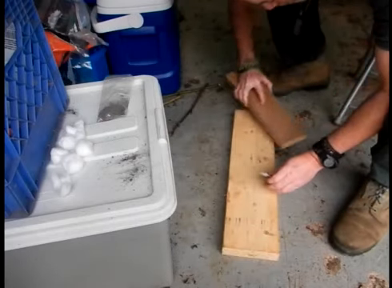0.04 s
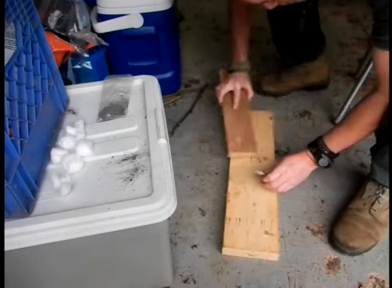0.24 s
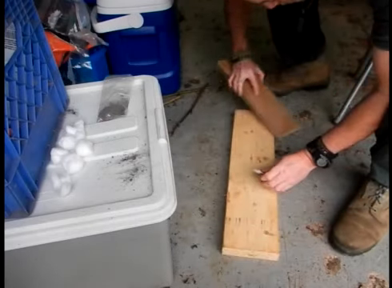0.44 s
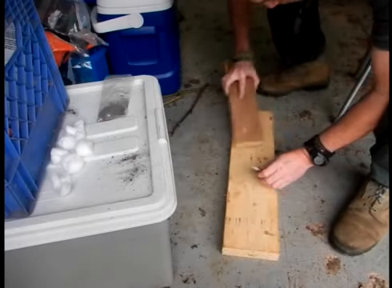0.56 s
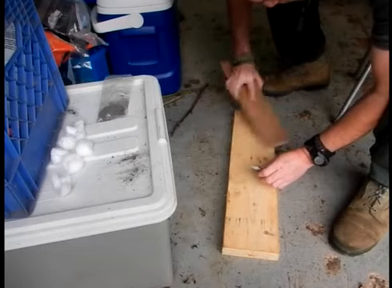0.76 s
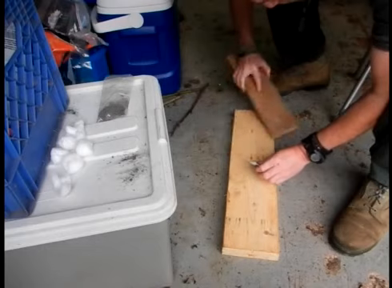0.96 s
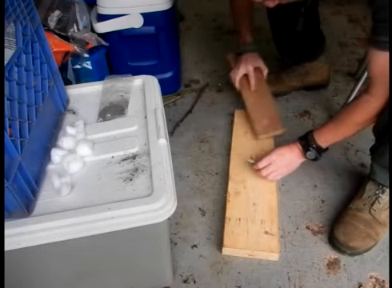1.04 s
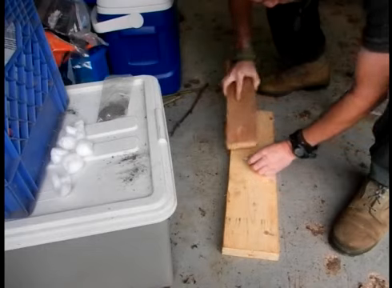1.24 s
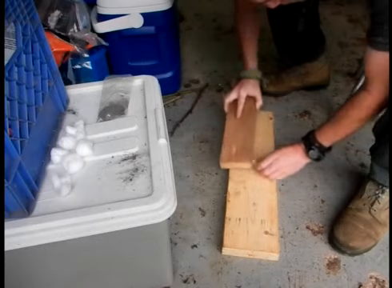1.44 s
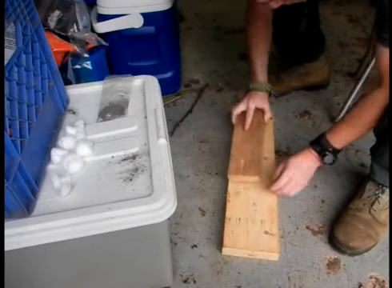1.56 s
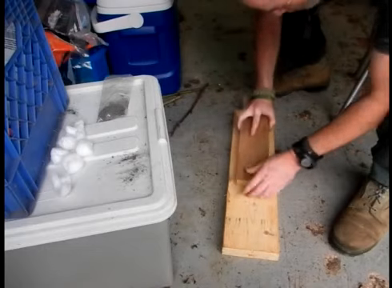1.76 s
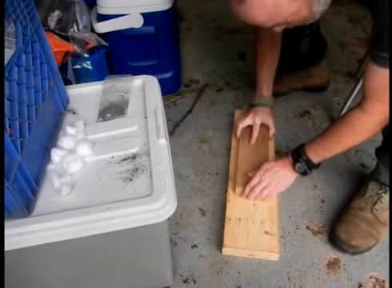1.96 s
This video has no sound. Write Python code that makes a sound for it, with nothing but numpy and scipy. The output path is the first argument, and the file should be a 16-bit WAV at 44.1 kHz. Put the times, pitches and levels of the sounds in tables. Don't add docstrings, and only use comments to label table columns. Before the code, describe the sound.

A wooden board knocks onto another and scrapes across it in two short, gritty strokes

```python
import sys
import numpy as np
from scipy import signal
from scipy.io import wavfile
from scipy.ndimage import uniform_filter1d

SR = 44100
rng = np.random.default_rng(int(sys.argv[2]) if len(sys.argv) > 2 else 0)


def magnitude_from_level(level_db):
    exponent = np.asarray(level_db, float) / 20
    return 10 ** exponent


def generate_wav(sig):
    pcm = np.round(np.clip(np.atleast_2d(sig).T, -1, 1) * 32767).astype(np.int16)
    wavfile.write(sys.argv[1], SR, pcm)


N = 88200

# (frequency [Hz], density [dB per Hz])
HUSH_SPECTRUM = [(25, -38), (66, -24), (368, -13.5), (433, 1.5), (703, -8.5), (1020, -6), (7500, -21),
                 (14300, -25.5), (15500, -25)]
# (time [s], level [dB])
HUSH_FADER = [(0.0, -52.5), (0.41, -51.5), (1.06, -51.5), (2.0, -50.5)]
# (centre [Hz], width [Hz], level [dB])
HUSH_HUMPS = [(398.3, 98, -10.5), (1064, 67, -22.5), (121.6, 113, -12)]
# (time [s], level [dB])
RUSTLE_FADER = [(0, -83), (.9, -84), (1.25, -62), (1.62, -62.5), (1.85, -57.5), (2, -52.5)]
# (frequency [Hz], likeness [0 to 1])
HUSH_LIKENESS = [(60, 0.34), (180, 0.14), (550, 0.034), (1650, 0.47), (4970, 0.33), (15000, 0.016)]
# (frequency [Hz], left over right [dB])
NOISE_LEAN = [(60, 11), (180, -7.5), (550, 3.5), (1650, 2.5), (4970, 2), (15000, -4)]
# (frequency [Hz], left over right [dB])
WOOD_LEAN = [(120, 1), (500, 4.6), (1100, 2.2), (2000, 1.2), (4000, .4)]
# (time [s], level [dB], pitch [Hz])
FLOOR_THUDS = [(0.207, -30.5, 141), (0.206, -29.5, 46), (.318, -40, 112), (.639, -30.5, 390),
               (.645, -39, 191), (0.662, -39, 135), (0.721, -47, 50), (1.9, -47, 194), (0.49, -52, 87),
               (1.887, -53, 55)]
# (time [s], pitch [Hz], level [dB], T60 [s])
SINGLE_RINGS = [(1.657, 507, -41, .22), (1.658, 707, -41, .22), (1.704, 500, -45, .09),
                (1.888, 520, -40.5, .17), (1.894, 1780, -45, .08), (1.8868, 1250, -38, .04),
                (.431, 1800, -44, .1), (.709, 720, -29, .13), (.313, 715, -37, .1), (.6388, 3560, -31, .04),
                (.6388, 4250, -33, .04), (.6388, 5700, -28, .035)]
# (pitch [Hz], level when knocked [dB], T60 [s], level when rubbed [dB])
WOOD_MODES = [(380.6, -11.5, 0.11, -32), (511.4, 4, 0.16, -15.5), (720, -7, 0.15, -4.5),
              (870, -7, 0.06, -28), (1106, -1, 0.073, -8), (1260, -47, 0.07, -0.5), (1340, -47, 0.08, -32),
              (1600, -36, 0.011, -1), (1628, 0, 0.064, -5), (1802, 6, 0.073, -5.5), (1982, 0.5, 0.056, -1),
              (2310, 5, 0.011, -26), (2854, -5.5, 0.051, -19), (3460, -9, 0.05, -30)]
# (time [s], crack [dB], crack pitch [Hz], rings under 1 kHz [dB], rings above [dB])
KNOCKS = [
    (0.2046, -15, 1647, -12.5, -15.5),
    (0.425, -50, 1860, -56, -46),
    (.638, -14.5, 1810, -13.5, -15),
    (1.6562, -32.5, 1120, -58, -42.5),
    (1.705, -59, 674, -69, -60),
    (1.8862, -31, 1290, -49, -39),
]
# (pitch [Hz], level [dB], T60 [s])
SPLINTER_RINGS = [(3650, -16, 0.044), (4170, -3, 0.099), (4980, 6, 0.031), (5320, 1, 0.084),
                  (5600, -14, .035)]
# (time [s], level [dB], favoured pitch [Hz], length [s])
SLIPS = [(0.243, -26.5, 1590, 0.005), (0.254, -30, 1704, 0.0076), (0.272, -23, 1660, 0.0023),
         (0.275, -30.5, 1795, 0.0076), (0.2846, -28, 1910, 0.0077), (.303, -33, 1640, 0.0068),
         (0.3143, -22.5, 1665, 0.0058), (0.324, -30, 1487, 0.0053), (0.322, -48, 508, 0.017),
         (0.339, -39.5, 1230, 0.0083), (0.4234, -36, 2980, 0.0037), (.4238, -32.5, 1470, 0.0023),
         (0.4247, -31.5, 1827, 0.0059), (0.4334, -40, 1860, 0.0055), (.255, -50.5, 513, 0.028),
         (0.673, -44, 587, .02), (0.689, -32, 1480, 0.0086), (.718, -28.5, 1770, 0.0058),
         (0.684, -33, 1223, 0.0071), (0.695, -31, 1600, 0.0056), (0.703, -24, 1800, 0.0054),
         (.710, -25, 1737, 0.0046), (0.7114, -38, 1810, 0.0043), (0.716, -31, 1700, 0.0069),
         (0.734, -40, 1790, 0.0027), (.746, -49, 1780, 0.0032), (1.658, -57, 1800, 0.0043)]
# (time [s], pressure [dB], sliding speed as fine hiss [dB])
STROKES = [
    [(.16, -119, -6), (.185, -61, -13), (.22, -63, 1.5), (.25, -52, -3.5), (.29, -53.5, -3.5),
     (.322, -52, -3), (.36, -67.5, 4), (.41, -78.5, 5)],
    [(.41, -71, 3), (.422, -70, 7), (.4255, -50, -2.5), (.438, -60, -1.5), (.46, -72.5, 4.5), (.52, -79, 2)],
    [(.6, -96, -8), (.63, -57, -18), (.645, -54.5, -6.5), (.68, -60.5, -3.5), (.712, -53.5, -1),
     (.735, -60.5, -2), (.76, -69.5, -2), (.85, -80, 1)],
]
STROKE_WEIGHT_DB = [0, -14, 0]
# (frequency [Hz], density [dB per Hz])
RUB_SPECTRUM = [(200, -19), (728, -8.5), (957, -7.5), (1650, -5), (2290, -11), (6500, -20.5),
                (12500, -16.5), (15500, -29.5)]

WEIGHT_HZ = 1300
DULL_DB_PER_OCT = 16
RING_DELAY_S = 0.000963


def rms_one(x):
    return x / np.sqrt(np.mean(x ** 2) + 1e-20)


def in_time(rows, axis=1):
    rows = np.array(rows)
    return np.interp(np.arange(N) / SR, rows[:, 0], rows[:, axis])


def at_hz(points, hz):
    points = np.array(points)
    return np.interp(np.log(hz), np.log(np.maximum(points[:, 0], 1)), points[:, 1])


def pan(lean_db):
    return magnitude_from_level([[lean_db / 2], [-lean_db / 2]])


def drift(rate_hz):
    r = np.exp(-2 * np.pi * rate_hz * 40 / SR)
    white = rng.standard_normal(N // 40 + 2002)
    slow = rms_one(signal.lfilter([1], [1, -2 * r, r * r], white)[2000:])
    return np.interp(np.arange(N) / 40, np.arange(len(slow)), slow)


def click(s):
    return 1. * (np.arange(N) == int(s * SR))


def cushion(hits):
    return signal.lfilter(*signal.butter(2, 3740, fs=SR), hits)


def ring(clicks, hz, t60):
    r, w = magnitude_from_level(-60 / (t60 * SR)), 2 * np.pi * hz / SR
    return signal.lfilter([0, np.sin(w)], [1, -2 * r * np.cos(w), r * r], clicks + 1e-18)


def band(x, low_hz, high_hz):
    sos = signal.butter(2, [low_hz, min(high_hz, SR / 2.2)], "band", fs=SR, output="sos")
    return signal.sosfilt(sos, x)


def banded(white, spectrum, patchy_db, alike_at):
    out, together = 0, drift(1.5)
    edges = 22 * 2 ** np.arange(0, 9.6, .5)
    for k, (low, high) in enumerate(zip(edges, edges[1:])):
        mid, side = band(white[k % 2], low, high)
        hz = np.sqrt(low * high)
        alike = np.clip(alike_at(hz), -1, 1)
        flicker_db = patchy_db * (.3 * together + .6 * drift(6))
        gain = magnitude_from_level(at_hz(spectrum, hz) + flicker_db) * pan(at_hz(NOISE_LEAN, hz))
        out = out + gain * (np.sqrt(1 + alike) * mid + np.sqrt(1 - alike) * side * [[1], [-1]])
    return rms_one(out)


def hush():
    white = rng.standard_normal((2, 2, N))
    out = banded(white, HUSH_SPECTRUM, 1.93, lambda hz: at_hz(HUSH_LIKENESS, hz) + 0.017)
    mid, side = rng.standard_normal((2, N))
    air = mid + 0.69 * side * np.array([[1], [-1]])
    for hz, width_hz, db in HUSH_HUMPS:
        out = out + magnitude_from_level(db) * rms_one(band(air, hz - width_hz / 2, hz + width_hz / 2))
    return magnitude_from_level(in_time(HUSH_FADER) + 0.5) * out


def rustle():
    level = magnitude_from_level(in_time(RUSTLE_FADER) + 0.5 * drift(45))
    return level * rms_one(band(rng.standard_normal((2, N)), 2200, 11700))


def whine():
    tone = np.sqrt(2) * np.sin(2 * np.pi * 14835 * np.arange(N) / SR)
    return magnitude_from_level(-70.5) * pan(-5) * tone


def garage(x):
    t60_s, wall_cut_hz = 0.25, 3400
    out, dull = np.zeros((2, N)), np.exp(-2 * np.pi * wall_cut_hz / SR)
    for k, lag in enumerate((rng.uniform(.006, .03, 16) * SR).astype(int)):
        loop, state = x.copy(), [0.]
        gain = magnitude_from_level(-60 * lag / SR / t60_s)
        for i in range(lag, N, lag):
            back, state = signal.lfilter([gain * (1 - dull)], [1, -dull], loop[i - lag:i], zi=state)
            loop[i:i + lag] += back[:N - i]
        out[k % 2] += (loop - x) * (-1) ** (k // 2)
    return out


def floor_thuds():
    return sum(magnitude_from_level(db) * ring(cushion(click(s)), hz, 0.11) for s, db, hz in FLOOR_THUDS)


def single_rings():
    out = np.zeros((2, N))
    for s, hz, db, t60 in SINGLE_RINGS:
        out += magnitude_from_level(db) * pan(at_hz(WOOD_LEAN, hz)) * ring(cushion(click(s)), hz, t60)
    return out


def knocked_wood():
    s, _, crack_hz, low_db, high_db = np.transpose(KNOCKS)
    spots_db = rng.normal(0, 2.3, (len(s), len(WOOD_MODES)))
    out = np.zeros((2, N))
    for k, (hz, knock_db, t60, _) in enumerate(WOOD_MODES):
        hits, low = np.zeros(N), hz < 1000
        at = ((s + RING_DELAY_S + low * 0.0014) * SR).astype(int)
        dull_db = DULL_DB_PER_OCT * np.log2(crack_hz / 1600) * max(np.log2(hz / 1900), 0)
        level_db = -11 + knock_db + spots_db[:, k] + (low_db if low else high_db) + dull_db
        hits[at] = (-1) ** k * magnitude_from_level(level_db)
        out += ring(cushion(hits), hz, t60) * pan(at_hz(WOOD_LEAN, hz))
    return out


def burst(s, length_s, hz, rough, sag_oct=0):
    out, size = np.zeros(N), int(length_s * SR)
    noise, along = rng.standard_normal(SR // 20)[:size], np.linspace(0, 1, size)
    phase = np.cumsum(2 * np.pi * hz * 2 ** (sag_oct * (.5 - along)) / SR)
    tone = np.sin(phase + rough * np.cumsum(noise) / 8)
    out[int(s * SR):int(s * SR) + size] = np.hanning(size) * tone * (1 + rough * uniform_filter1d(noise, size=12))
    return out


def cracks():
    crack_s = 0.00334
    out = np.zeros((2, N))
    for s, db, hz, _, _ in KNOCKS:
        out += magnitude_from_level(db) * pan(1.8) * burst(s, crack_s, hz, 0.49, sag_oct=0.77)
        hard = db > -25
        out += hard * magnitude_from_level(db - 6.5) * burst(s + 0.00095, crack_s, min(hz * 0.628, 1050), 0)
        splinters = sum(magnitude_from_level(d) * ring(click(s + RING_DELAY_S), f, t60) for f, d, t60 in SPLINTER_RINGS)
        out += magnitude_from_level(db - 35 + DULL_DB_PER_OCT * np.log2(hz / 1600)) * splinters
    return out


def grit_grains():
    sizes = magnitude_from_level(2 * np.minimum(rng.exponential(1, N), 5)) * rng.choice([-1, 1], N)
    return rms_one(sizes * (rng.random(N) < 3600 / SR))


def slip_chirps():
    return sum(magnitude_from_level(db) * burst(s, length_s, hz, .3) for s, db, hz, length_s in SLIPS)


def rubbed_wood(grit, slips, pressure, weight):
    out = np.zeros((2, N))
    for hz, _, t60, rub_db in WOOD_MODES:
        body = weight if hz < WEIGHT_HZ else 1
        drive = magnitude_from_level(rub_db - 10) * pressure * grit * body + magnitude_from_level(-35) * slips
        out += ring(drive, hz, t60 * .42) * pan(at_hz(WOOD_LEAN, hz))
    return out


def rub_hiss(grit, speed, weight):
    def split(x, hz, kind):
        return signal.sosfiltfilt(signal.butter(2, hz, kind, fs=SR, output="sos"), x)

    white = rng.standard_normal((2, 2, N)) + 0.66 * grit * [[1], [0]]
    hiss = banded(white, RUB_SPECTRUM, 1.5, lambda hz: .9 - .3 * max(np.log2(hz / 2000), 0))
    hiss = signal.sosfilt(signal.butter(2, 448, "high", fs=SR, output="sos"), hiss)
    body, fine = split(hiss, WEIGHT_HZ, "low"), split(hiss, 5000, "high")
    return hiss + (weight - 1) * body + (speed - 1) * fine


def rasp(grit):
    low_hz, high_hz, count, ring_cycles = 2356, 6300, 16, 55
    dealt = np.where(rng.random(N) < .7, rng.integers(0, count, N), -1)
    fibres = []
    for k, hz in enumerate(np.geomspace(low_hz, high_hz, count)):
        gain = magnitude_from_level(3.5 * drift(24.0) - 1.3 * np.log2(hz / low_hz))
        fibres.append(gain * ring(grit * (dealt == k), hz, ring_cycles / hz))
    leans_db = rng.normal(0, 2.6, count)
    return rms_one(sum(fibre * pan(lean_db) for fibre, lean_db in zip(fibres, leans_db)))


def drag(grit, slips):
    t = np.arange(N) / SR
    during = [(t >= rows[0][0]) * (t < rows[-1][0]) for rows in STROKES]
    pressure = sum(magnitude_from_level(in_time(rows)) * on for rows, on in zip(STROKES, during))
    speed = sum(magnitude_from_level(in_time(rows, axis=2)) * on for rows, on in zip(STROKES, during))
    weight = sum(magnitude_from_level(db) * on for db, on in zip(STROKE_WEIGHT_DB, during))
    out = rubbed_wood(grit, slips, pressure, weight) + slips * pan(1.4)
    out += magnitude_from_level(17) * pressure * rub_hiss(grit, speed, weight)
    return out + magnitude_from_level(8.5) * pressure * rasp(grit)


def scene():
    grit, slips = grit_grains(), slip_chirps()
    wood = floor_thuds() + single_rings() + knocked_wood() + cracks() + drag(grit, slips)
    t = np.arange(N) / SR
    wood[0] = np.interp(t - .000025, t, wood[0])
    return wood + magnitude_from_level(-19.5) * garage(wood.mean(axis=0)) + hush() + rustle()


def top_cut(x):
    return signal.sosfilt(signal.butter(12, 15720, fs=SR, output="sos"), x)


def record(dry):
    def below(hz):
        return signal.sosfiltfilt(signal.cheby2(12, 30, hz, fs=SR, output="sos"), dry)

    low, full = below(14400), below(15900)
    mix = low + magnitude_from_level(-16) * (full - low) + whine()
    return top_cut(mix)


dry = scene()
out = record(dry)
generate_wav(out)
```